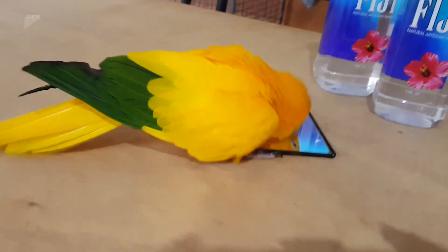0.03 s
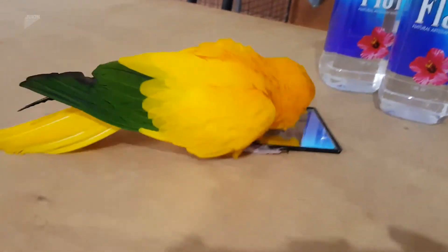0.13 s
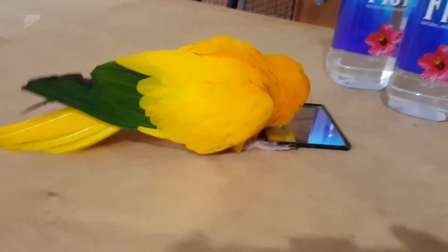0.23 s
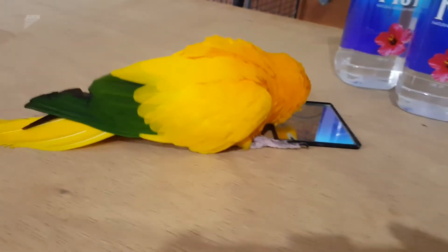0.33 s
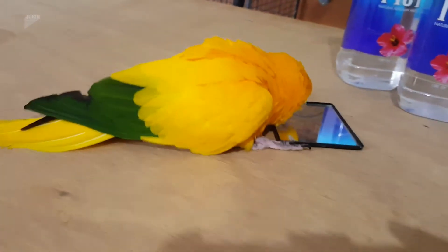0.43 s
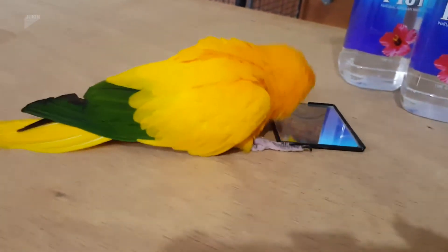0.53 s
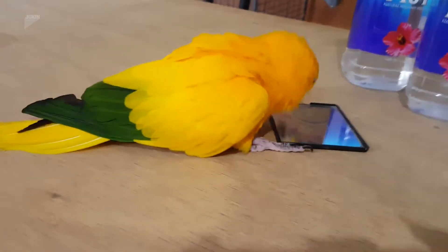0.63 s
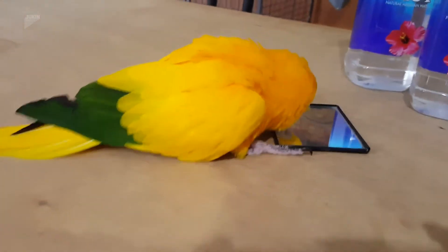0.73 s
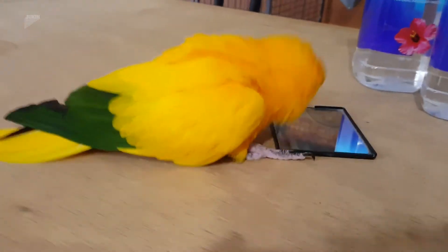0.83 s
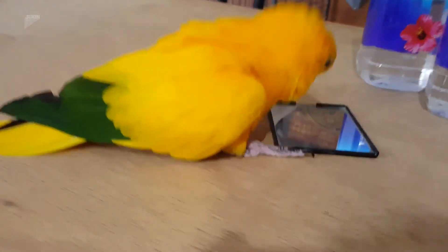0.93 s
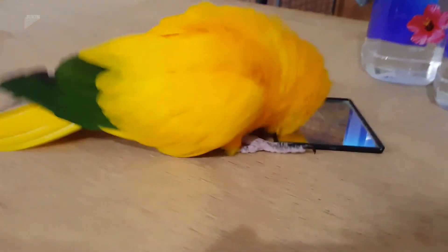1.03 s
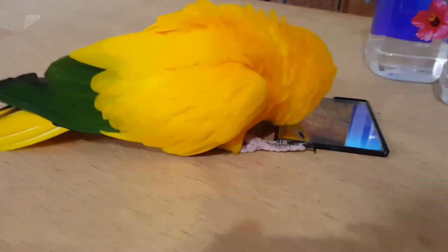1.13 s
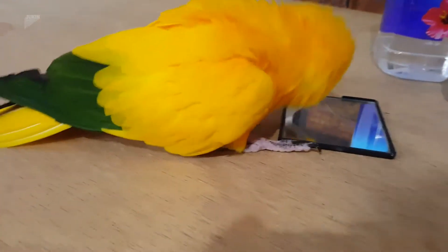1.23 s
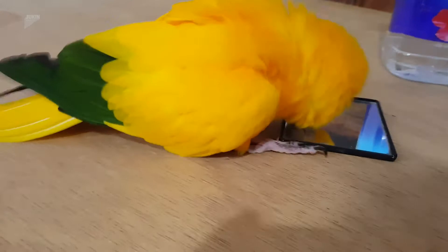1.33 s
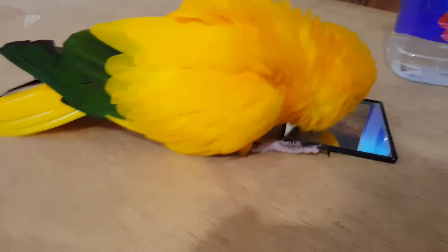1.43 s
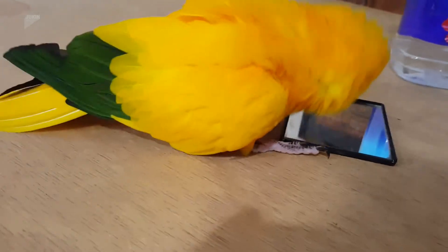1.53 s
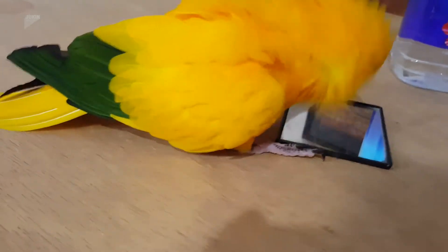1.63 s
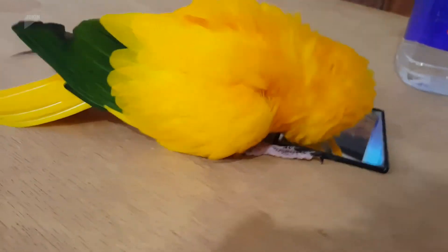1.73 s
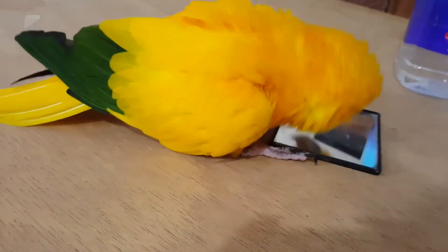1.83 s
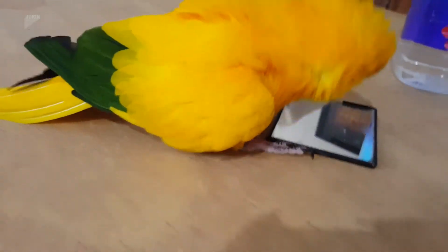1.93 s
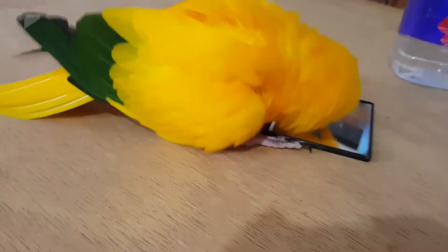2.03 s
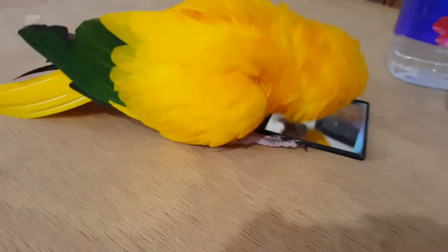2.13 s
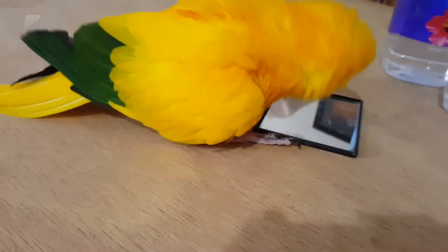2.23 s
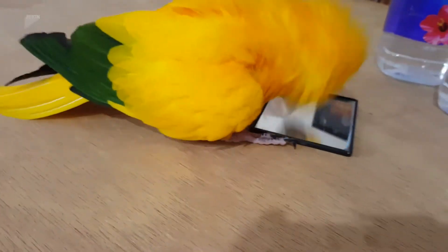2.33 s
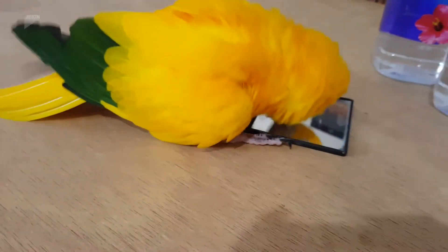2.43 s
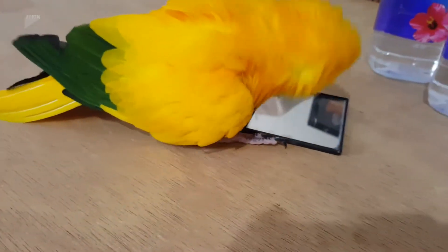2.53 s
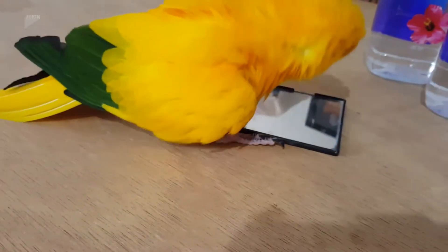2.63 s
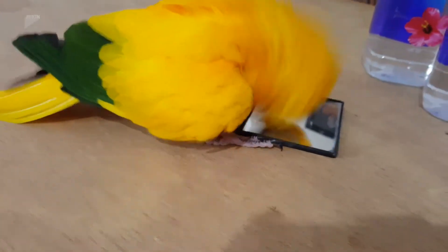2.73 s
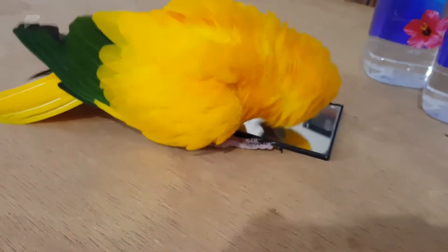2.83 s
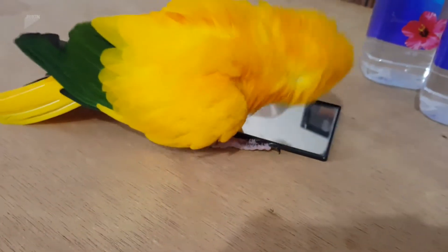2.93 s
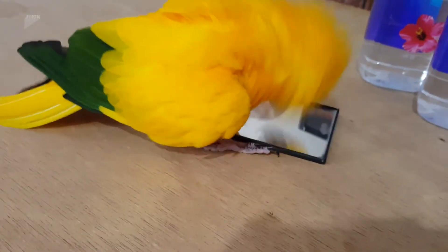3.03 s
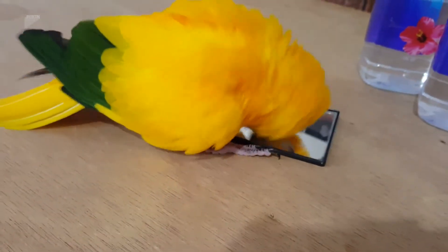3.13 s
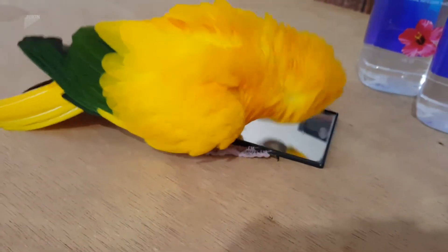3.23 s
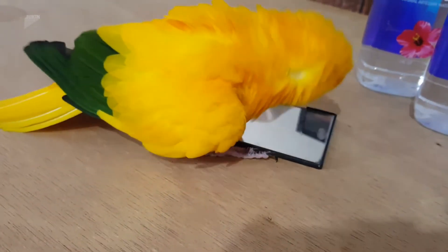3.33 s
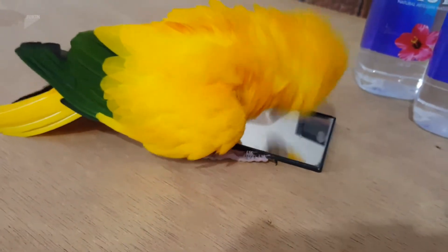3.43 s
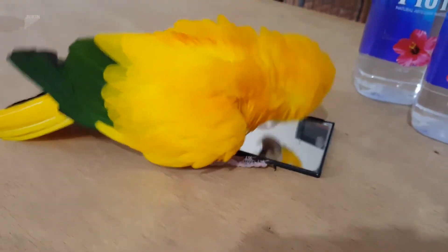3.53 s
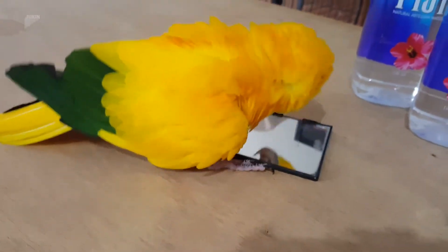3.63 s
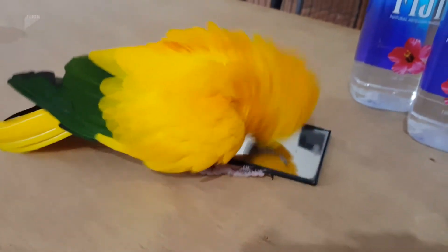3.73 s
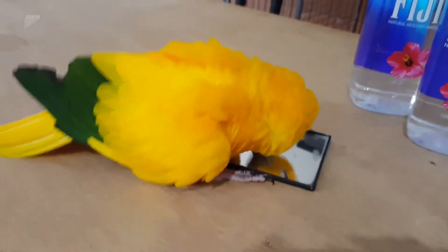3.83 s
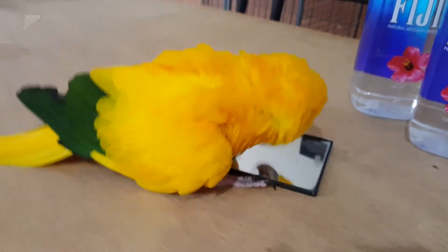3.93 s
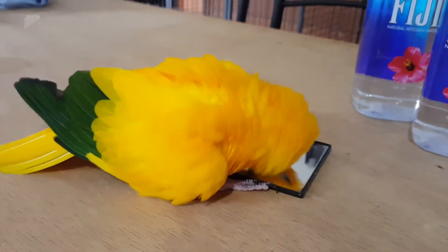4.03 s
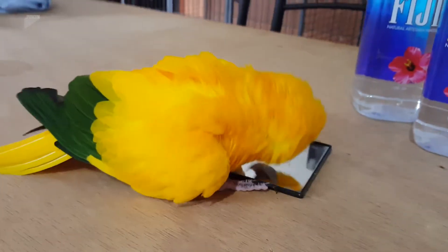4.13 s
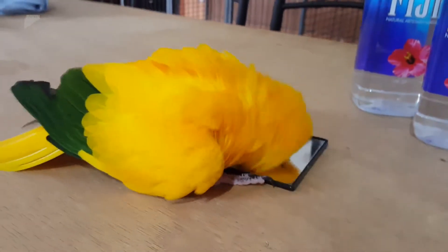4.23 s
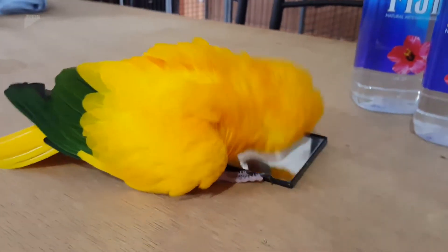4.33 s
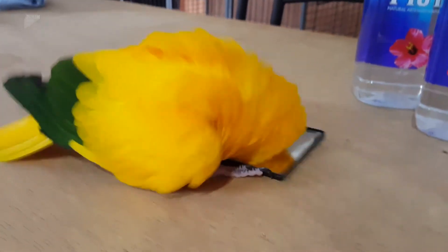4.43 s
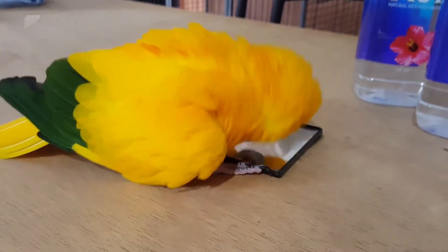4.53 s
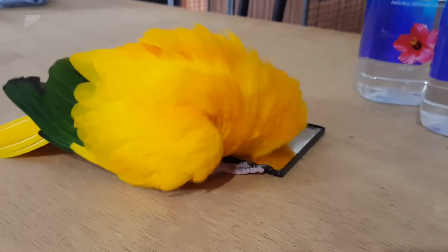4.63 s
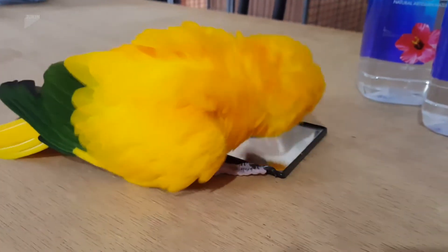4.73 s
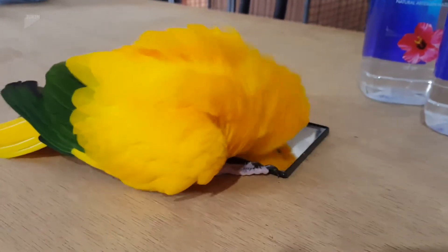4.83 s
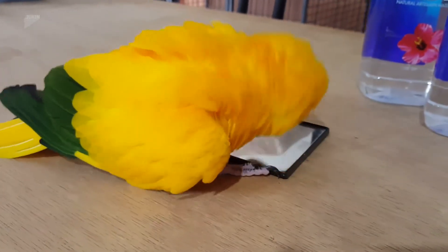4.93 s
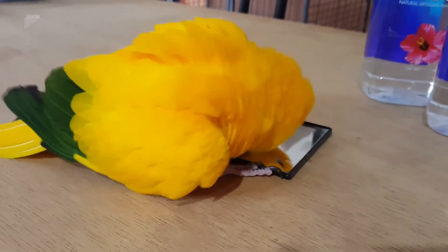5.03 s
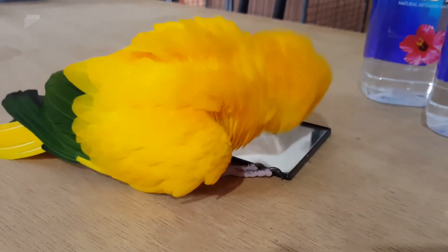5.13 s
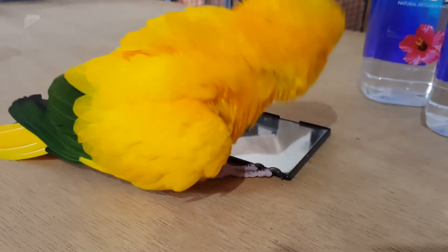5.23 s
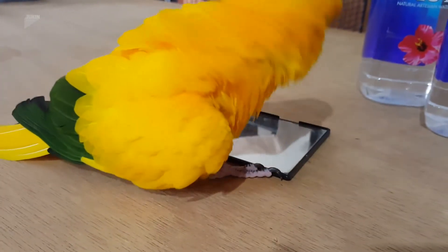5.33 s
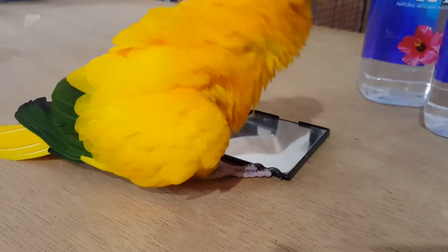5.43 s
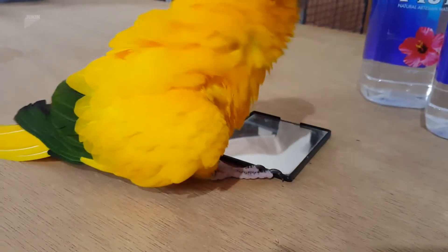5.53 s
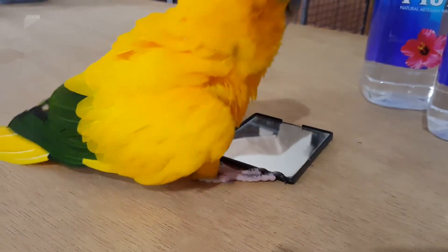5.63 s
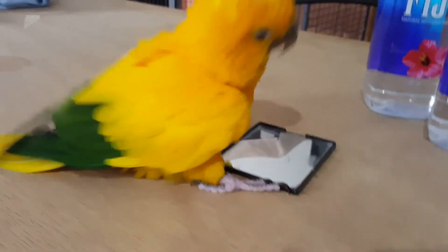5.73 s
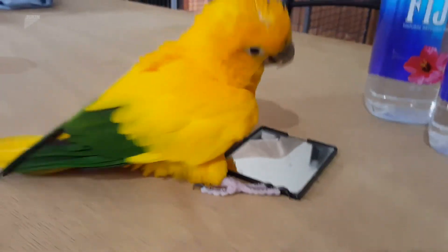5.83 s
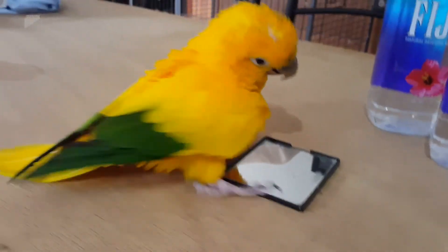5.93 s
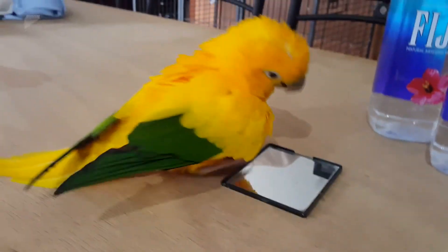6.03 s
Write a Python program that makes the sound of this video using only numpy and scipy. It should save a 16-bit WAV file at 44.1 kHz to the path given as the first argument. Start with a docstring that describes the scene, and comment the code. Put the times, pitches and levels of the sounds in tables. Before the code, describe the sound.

A parrot's claws tick lightly and its feathers rustle on a wooden table. It then pecks a small mirror about fifteen times, each peck a sharp glassy crack with a thump from the wood. The pecks get faster and softer, and the bird gives one short squawk. The sound is close, in a fairly live room with a faint appliance hum and a little handling rumble on the microphone.

```python
"""In a fairly live room with a humming appliance, a parrot's claws tick and its feathers scuff on a table.
After a second it pecks at a small framed mirror lying there, and the first peck sets the mirror rocking.
Each peck draws a sharp crack from the glass and a thump from the wood; the mirror hops and knocks back.
The pecks quicken and fade, while the hand holding the microphone rumbles now and then.
At 5.5 s the bird squawks once: a harmonic cry that swoops up, cracks and collapses."""
import sys
import numpy as np
from scipy import signal
from scipy.fft import rfft, irfft, next_fast_len
from scipy.io import wavfile

SR = 44100
rng = np.random.default_rng(int(sys.argv[2]) if len(sys.argv) > 2 else 0)


def file_out(sig):
    """Save sig as 16-bit WAV at sys.argv[1]."""
    # one column per channel
    cols = np.atleast_2d(sig).T
    # limit, then scale
    lim = np.clip(cols, -1, 1)
    pcm = np.round(lim * 32767).astype(np.int16)
    wavfile.write(sys.argv[1], SR, pcm)


N = 268172
TIME = np.arange(N) / SR

# The centres of the mirror's four parts in Hz: frame, glass, upper glass, beak click.
PART_CENTRES_HZ = [1400, 2500, 4900, 13000]
# The room's reverb. Each row: frequency in Hz, relative level in dB, early and late decay (t60)
# in seconds, left-right likeness from 0 to 1.
ROOM_BANDS = [(84.4, 5.5, 0.25, 1.1, 0.97), (270, -2, 1, 0.56, 0.93), (590, 6.5, 0.098, 0.57, 0.61),
              (980, 3, 0.077, 0.76, 0.085), (1395, 2.5, 0.057, 0.65, 0), (2300, -2.5, 0.34, 1.14, 0),
              (3760, -2, 0.35, 0.91, 0), (5350, -4.5, 0.51, 0.72, 0), (8530, -6, 0.42, 0.63, 1),
              (9710, -23, 0.059, 0.62, 0), (16500, 2.5, 0.073, 0.39, 0)]

# The squawk's timeline, and the time constant of its final drop in pitch.
CRY_START_S, CRY_TOP_S, CRACK_S, COLLAPSE_S, CRY_END_S = 5.508, 5.548, 5.691, 5.716, 5.75
FALL_S = .01


def blows(times, force_db, glassiness_db, clack_db, click_db):
    """Contacts as rows of time in seconds, then dB in table, frame, glass, upper glass and beak click."""
    # Force drives every part; a glassier spot trades table thump for ping.
    # Each row, from table to beak click: offset in dB, dB gained per dB of glassiness.
    coupling = [(2, -0.24), (1.55, -0.05), (-1.3, 0.67), (0, 1.85), (2.5, 1.4)]
    offset_db, slope = np.transpose(coupling)
    wood, frame, glass, ping, click = force_db + offset_db[:, None] + slope[:, None] * glassiness_db
    return np.c_[times, wood, frame, glass + clack_db, ping, click + click_db]


def pecking(hop_s=.013, hop_s_per_db=.0012, softer_db=18.5):
    """The beak strikes; the mirror hops and lands more softly, a little later after a lighter peck."""
    # Each row: start in seconds, force in dB, glassiness in dB (above 0 on open glass, below 0 near
    # the frame), extra mid clack in dB, extra beak click in dB.
    strokes = [(1.0827, 2, -3, -4, -36), (1.4223, 2.5, -2, 1.5, -2.5), (1.754, 3.5, 1, -1, -3),
               (2.0973, 3.5, 1, -2.5, -8), (2.4443, -0.8, 3, 0.5, -6), (2.8231, 3.5, 2, -2.5, -10.5),
               (3.1776, 2.5, 3, 1.5, -40), (3.552, -0.54, 2, 1, -14), (3.8216, .5, 2, -3.5, -9.5),
               (4.07, -0.9, -2, 1, -8), (4.2971, -8, -6, 6, 5.5), (4.5007, -2.5, 2.5, -1.5, -9.5),
               (4.6918, -4.5, 2, 0, -4), (4.9007, -7.5, -3, -.5, -5), (5.1209, -14, -3, -0.5, -17)]
    times, force_db, *colour_db = np.transpose(strokes)
    pecks = blows(times, force_db, *colour_db)
    airborne_s = np.maximum(hop_s - hop_s_per_db * force_db, hop_s / 2)
    landings = np.c_[times + airborne_s, pecks[:, 1:] - softer_db]
    return pecks, landings


def rocking(start_s, first_swing_s=.0293, shrink=.68, loss_db=7, corner_lag_s=.0025):
    """The mirror clatters on its frame, corner after corner, in ever shorter and weaker swings."""
    # The clatter's starting levels in dB: table, frame, glass, upper glass, beak click.
    clatter_db = [-2.5, 11, -0.5, -11.5, -47]
    swing = np.arange(3)
    times = start_s + first_swing_s * (1 - shrink ** swing) / (1 - shrink)
    levels_db = np.array(clatter_db) - loss_db * swing[:, None]
    first_corner = np.c_[times, levels_db][1:]   # the opening contact is the peck itself
    second_corner = np.c_[times + corner_lag_s, levels_db - 10]
    return np.r_[first_corner, second_corner]


def mirror(contacts, detune=.017, scatter_db=1.9):
    """Frame and glass ring for milliseconds; the beak's pressure and aim shift the modes at every blow."""
    # The mirror's modes. Each row: frequency in Hz, width in Hz, relative level in dB.
    modes = [(1207, 123, 13.5), (1586, 65, 12), (1840, 162, 10.5), (2243, 190, 13.5), (2483, 410, 20),
             (2685, 830, 19.5), (3816, 340, 14), (3844, 360, 15), (4970, 262, 14), (5550, 480, 0.5),
             (7590, 430, 12), (11610, 660, -5), (10940, 3700, -13), (14100, 540, 1)]
    size = 2 ** 11
    out = np.zeros((2, N + size))
    impulse = signal.unit_impulse(size)
    variations = rng.standard_normal((len(contacts), len(modes), 3))
    for (start_s, _, *part_db), variation in zip(contacts, variations):
        at = round(start_s * SR)
        for k, ((hz, width_hz, db), (shift, strength, side)) in enumerate(zip(modes, variation)):
            blow_db = db + np.interp(np.log(hz), np.log(PART_CENTRES_HZ), part_db) + scatter_db * strength
            ring = from_db(blow_db) * resonate(impulse, hz * (1 + detune * shift), width_hz)
            out[:, at:at + size] += (-1) ** k * panned(ring, scatter_db * side)
    return out[:, :N]


def broad_crack(contacts, relative_width=.37):
    """Summed over all directions, the mirror's modes blur into one broad hump for each part."""
    # Relative levels in dB: frame, glass, upper glass, beak click.
    hump_db = [8.5, 10.5, 5, -14]
    out = np.zeros(N)
    for k, (hz, db) in enumerate(zip(PART_CENTRES_HZ, hump_db)):
        hits = clicks(contacts[:, 0], contacts[:, 2 + k] + db)
        out += (-1) ** k * resonate(hits, hz, relative_width * hz)
    return out


def table_top(contacts, scatter_db=3):
    """Blows pass into the wood: a dull thud, and the board's low modes, stirred differently each time."""
    # The board's modes. Each row: frequency in Hz, width in Hz, relative level in dB.
    modes = [(93, 6.8, 11.5), (120.5, 6.8, 16.5), (165.7, 5.1, 20.5), (182.2, 1.4, 1), (220.4, 4.7, 13.5),
             (258.7, 11, 23), (257.4, 6.4, 9), (357, 18, 16.5), (465, 21, -0.5), (476, 4.9, 22),
             (492, 39, 8), (533, 60, -40), (640.4, 4.3, 17), (637, 63, 7)]
    times, blow_db = contacts[:, 0], contacts[:, 1]
    thud = resonate(clicks(times, blow_db + 6.5), hz=203.6, width_hz=312)
    thud = signal.sosfilt(signal.butter(2, [85, 900], "band", fs=SR, output="sos"), thud)
    stir_db = rng.normal(0, scatter_db, (len(contacts), len(modes)))
    ring = sum((-1) ** k * resonate(clicks(times, blow_db + db + stir_db[:, k]), hz, width_hz)
               for k, (hz, width_hz, db) in enumerate(modes))
    return thud, ring


def knock(landings, hz=566, width_hz=284):
    """The mirror's flat back meets the table with a hollow knock."""
    hits = clicks(landings[:, 0], landings[:, 1] + 19)
    return resonate(resonate(hits, hz, width_hz), hz, 2 * width_hz)


def cry_pitch(t, start_hz=540, top_hz=860, rest_hz=680, collapse_hz=330, sag_s=.04, crack_hz_per_s=7000):
    """The voice swoops up, sags towards rest, cracks upward and collapses."""
    rise = np.sin(np.pi / 2 * np.minimum((t - CRY_START_S) / (CRY_TOP_S - CRY_START_S), 1))
    sag = 1 - np.exp(-np.maximum(t - CRY_TOP_S, 0) / sag_s)
    cracked_s = np.clip(t, CRACK_S, COLLAPSE_S) - CRACK_S
    held_hz = start_hz + (top_hz - start_hz) * rise - (top_hz - rest_hz) * sag + crack_hz_per_s * cracked_s
    return collapse_hz + (held_hz - collapse_hz) * np.exp(-np.maximum(t - COLLAPSE_S, 0) / FALL_S)


def squawk(attack_s=.011, hold_s=.22, release_db_per_s=1105, soft_tilt_db=14.5, jitter=.09, flutter=.7):
    """A harmonic cry that grows louder and brighter with effort, and turns rough when it cracks."""
    # The response of throat and beak. Each row: frequency in Hz, relative gain in dB.
    throat = [(120, -57), (330, -8), (500, -0.5), (750, -6.5), (1100, 9), (1400, 2), (1750, -1.5),
              (2150, 2), (2500, -2), (2900, -8.5), (3600, -9), (4500, -9.5), (5600, -23.5), (7000, -26),
              (10000, -60)]
    # The rasp riding on the cry. Each row: frequency in Hz, relative noise density in dB.
    rasp_spectrum = [(200, -43), (700, -13), (1400, -12), (2400, -5), (3500, -10), (6000, -9), (7500, -20),
                     (11000, -31)]
    on = (TIME > CRY_START_S) & (TIME < CRY_END_S)
    t = TIME[on]
    effort = 1 - np.exp(-(t - CRY_START_S) / attack_s)
    dip_db = np.interp(t, [CRACK_S, COLLAPSE_S, COLLAPSE_S + FALL_S / 2], [0, 3, 0])
    release_db = release_db_per_s * np.maximum(t - CRY_START_S - hold_s, 0)
    # The rougher the syrinx, the more the tone jitters, flutters and hisses.
    roughness = np.where(t < CRACK_S, .12, .3)
    pitch_hz = cry_pitch(t) * (1 + jitter * roughness * drift(hz=260)[on])
    phase = 2 * np.pi * np.cumsum(pitch_hz) / SR
    tilt_db = soft_tilt_db * (1 - effort)   # loss per harmonic
    tone = sum(from_db(at_hz(throat, k * pitch_hz) - tilt_db * (k - 1)) * np.cos(k * phase)
               for k in range(1, 15))
    voice = rms_one(tone) * (1 + flutter * roughness * drift(hz=136)[on])
    rasp = from_db(-3.5) * roughness * coloured_noise(rasp_spectrum)[0, on]
    out = np.zeros(N)
    out[on] = (voice + rasp) * effort * from_db(-35.5 - dip_db - release_db)
    return signal.sosfilt(signal.butter(4, 280, "high", fs=SR, output="sos"), out)


def claws():
    """Claws touch the mirror and the wood in light ticks."""
    # Each row: start in seconds, force in dB, glassiness in dB.
    touches = [(0.059, -23, -22), (.171, -33.5, -0.5), (0.29, -44, 8), (0.372, -24, -5), (0.495, -22, -25),
               (0.726, -20.5, -10), (.744, -16.5, -41), (1.031, -29.5, -4), (5.26, -27, -5),
               (5.983, -55.5, 16)]
    return blows(*np.transpose(touches), clack_db=-3, click_db=1)


def brushing(grain_db=2.5):
    """Feathers and feet stroke the wood with a soft, grainy rustle as the bird settles."""
    # Each row: peak time in seconds, peak level in dB, half-length in seconds.
    strokes = [(.01, -60.5, 0.058), (.36, -56.5, 0.24), (.74, -54, 0.082), (1.055, -53.5, 0.042)]
    # The rustle's colour. Each row: frequency in Hz, relative noise density in dB.
    spectrum = [(200, -14), (900, -3.5), (2000, -2.5), (4500, -5.5), (8500, -18), (11000, -27),
                (16000, -24)]
    rustle = coloured_noise(spectrum) * from_db(grain_db * drift(hz=140))
    return swells(strokes) * rms_one(rustle)


def room(x, predelay_s=.0028, tail_db=-9):
    """Dense early reflections die quickly and leave a longer, weaker tail, each band at its own pace."""
    size = 2 ** 16
    t = np.arange(size) / SR
    hz, noise = diffuse(size)
    centres_hz = np.array(ROOM_BANDS)[:, 0]
    response = np.zeros((2, size))
    for share, (_, db, early_t60, late_t60, _) in zip(np.eye(len(ROOM_BANDS)), ROOM_BANDS):
        band = irfft(noise * at_hz(np.c_[centres_hz, share], hz))
        decay = (from_db(-60 * t / early_t60) + from_db(tail_db - 60 * t / late_t60)) * (t > predelay_s)
        response += from_db(db) * band * decay / np.linalg.norm(decay)
    return signal.fftconvolve(x[None], response, axes=1)[:, :N]


def hand_rumble(still_db=-65.5):
    """The hand on the microphone rumbles faintly, and louder whenever it shifts."""
    # Each row: peak time in seconds, peak level in dB, half-length in seconds.
    shifts = [(0, -50, 0.095), (1.6, -42.5, 0.37), (4.6, -48, 0.17)]
    # The rumble's colour. Each row: frequency in Hz, relative noise density in dB.
    spectrum = [(25, -13.5), (60, -3), (120, 12), (250, 2.5), (550, 2.5), (800, -12), (1100, -3),
                (1600, -18), (3000, -17.5), (8000, -39)]
    return np.hypot(from_db(still_db), swells(shifts)) * coloured_noise(spectrum)


def appliance_hum():
    """An appliance hums on three steady tones."""
    # Each row: frequency in Hz, rms level in dB.
    tones = [(100.5, -67.5), (301.5, -57.5), (780, -75.5)]
    return sum(np.sqrt(2) * from_db(db) * np.sin(2 * np.pi * (hz * TIME + rng.random())) for hz, db in tones)


def room_air(level_db=-57.5):
    """A steady, dark bed of room tone."""
    # Each row: frequency in Hz, relative noise density in dB.
    spectrum = [(25, -3.5), (55, -4), (90, 4), (122, -6.5), (165, 7.5), (300, 1.5), (550, 0), (800, -10),
                (1500, -8.5), (2300, -13), (3500, -15), (5300, -17), (8300, -25.5), (10000, -29.5),
                (15000, -24)]
    return from_db(level_db) * coloured_noise(spectrum)


def port(x, resonances):
    """A microphone port colours the sound with a chain of peaks and dips."""
    for hz, width_hz, db in resonances:
        x = x + (from_db(db) - 1) * resonate(x, hz, width_hz)
    return x


def resonate(x, hz, width_hz):
    """Two-pole resonance with gain 1 at its peak."""
    r = np.exp(-np.pi * width_hz / SR)
    feedback = [1, -2 * r * np.cos(2 * np.pi * hz / SR), r * r]
    return signal.lfilter(np.array([1, 0, -1]) * (1 - r * r) / 2, feedback, x + 1e-18)


def clicks(times, db):
    """One impulse for each contact."""
    out = np.zeros(N)
    out[np.clip(np.round(times * SR).astype(int), 0, N - 1)] = from_db(db)
    return out


def swells(rows):
    """Gain of movements that each grow to a peak and die away."""
    return sum(from_db(db) * np.exp(-np.abs((TIME - peak_s) / half_s) ** 1.87) for peak_s, db, half_s in rows)


def diffuse(size):
    """Frequencies and spectra of stereo white noise, alike in the bass and mostly unrelated higher up."""
    hz = np.arange(size // 2 + 1) * SR / size
    alike = np.clip(at_hz(np.array(ROOM_BANDS)[:, [0, -1]], hz), 0, 1)
    mid, side = rfft(rng.standard_normal((2, size)))
    return hz, np.sqrt((1 + alike) / 2) * mid + np.sqrt((1 - alike) / 2) * side * [[1], [-1]]


def coloured_noise(spectrum):
    """Diffuse stereo noise with a given spectrum, rms 1."""
    size = next_fast_len(N, True)
    hz, noise = diffuse(size)
    return rms_one(irfft(noise * from_db(at_hz(spectrum, hz)), size)[:, :N])


def drift(hz):
    """Random wander up to a given rate, rms 1."""
    return rms_one(signal.sosfilt(signal.butter(2, hz, fs=SR, output="sos"), rng.standard_normal(N)))


def at_hz(points, hz):
    """Read a curve on a log-frequency axis."""
    knots, values = np.transpose(points)
    return np.interp(np.log(np.maximum(hz, 1)), np.log(knots), values)


def panned(x, left_db):
    """Place a sound in stereo, the left channel left_db above the right."""
    return x * from_db([[left_db / 2], [-left_db / 2]])


def rms_one(x):
    """Scale to unit power."""
    return x / np.sqrt(np.mean(x ** 2) + 1e-20)


def from_db(db):
    """Decibels to gain."""
    return 10 ** (np.asarray(db) / 20)


def scene():
    """Pecks, claws and cry up close, with the room answering over a quiet background."""
    pecks, landings = pecking()
    contacts = np.r_[pecks, landings, rocking(start_s=pecks[0, 0]), claws()]
    crack = mirror(contacts)
    thud, wood_ring = table_top(contacts)
    thud += knock(landings)
    wood = thud + from_db(-4) * wood_ring
    cry = squawk()
    near = panned(crack, left_db=-3.5) + panned(wood, left_db=-2.5) + panned(cry, left_db=-2)
    near[1] = np.roll(near[1], 1)   # the sound reaches the right microphone a sample later
    # The room hears the broad crack, with a trace of each blow's own ring.
    crack_send = from_db(.5) * broad_crack(contacts) + from_db(-13) * crack[0]
    reverb = room(crack_send + from_db(3.44) * thud + from_db(8.1) * cry)
    rustle = brushing()
    background = appliance_hum() + room_air() + hand_rumble()
    return near + panned(reverb, left_db=.27) + rustle + panned(background, left_db=-1.2)


def record(dry, ceiling=.9, cutoff_hz=16500):
    """Each port colours its channel, the sharpest cracks are rounded off and the top is cut steeply."""
    # Each port's resonances and hollows. Each row: frequency in Hz, width in Hz, gain in dB.
    left_port = [(4760, 1400, -10), (8550, 660, 10), (14200, 920, -28)]
    right_port = [(1180, 430, -7.5), (2333, 330, 9.5), (3030, 3400, -11.5), (5560, 810, 9.5),
                  (8640, 4450, -18), (14670, 300, 6.5)]
    coloured = np.array([port(dry[0], left_port), port(dry[1], right_port)])
    rounded = coloured / (1 + (coloured / ceiling) ** 4) ** .25
    return signal.sosfilt(signal.ellip(10, .1, 80, cutoff_hz, fs=SR, output="sos"), rounded)


dry = scene()
out = record(dry)
file_out(out)
```